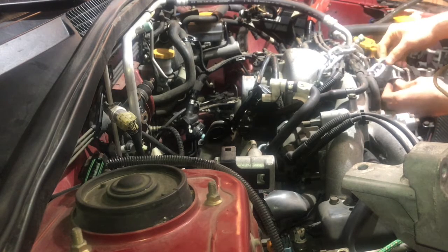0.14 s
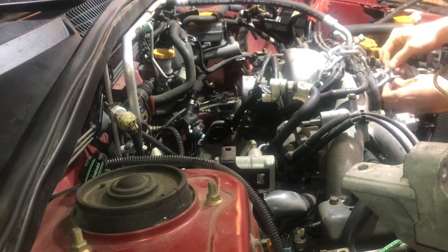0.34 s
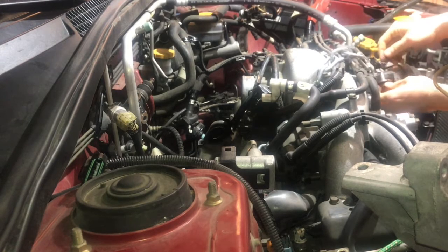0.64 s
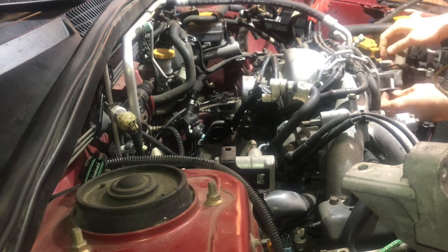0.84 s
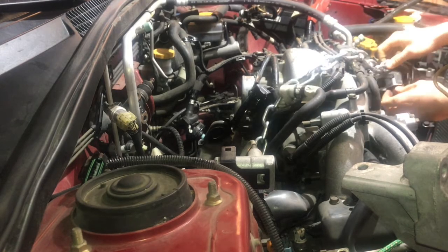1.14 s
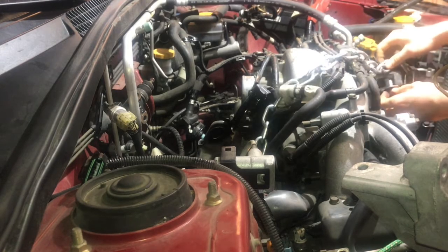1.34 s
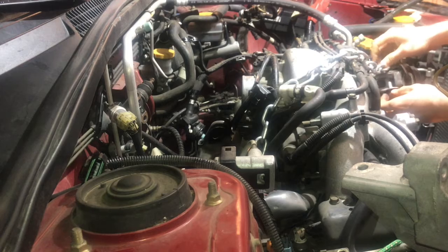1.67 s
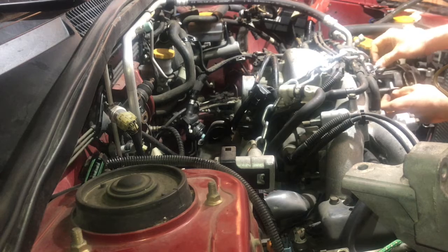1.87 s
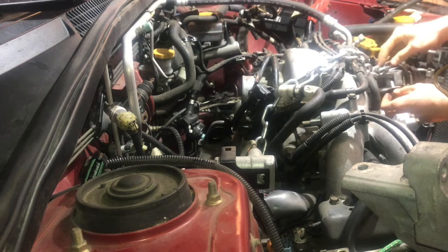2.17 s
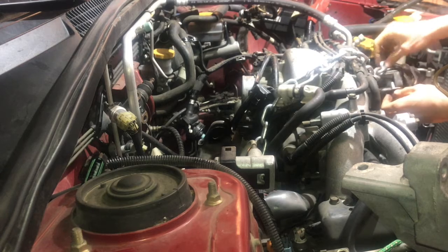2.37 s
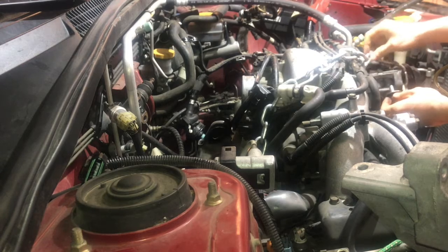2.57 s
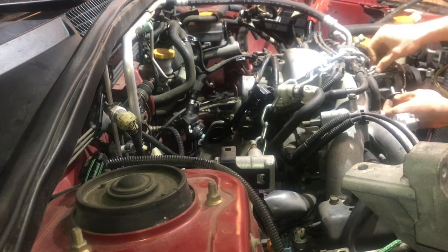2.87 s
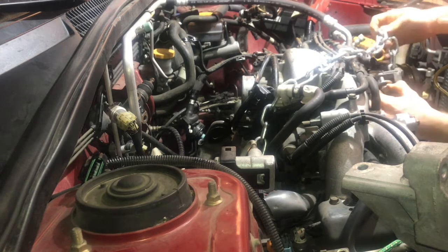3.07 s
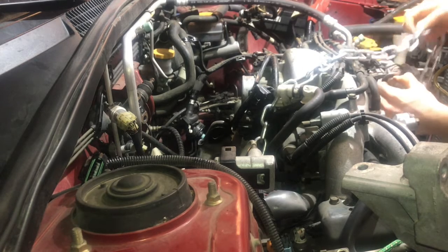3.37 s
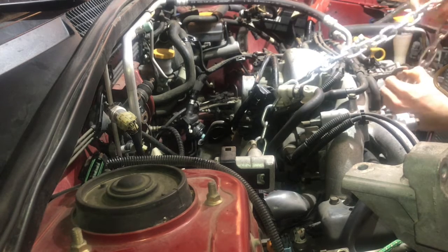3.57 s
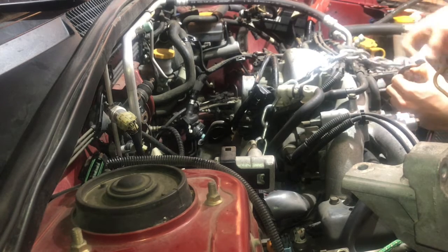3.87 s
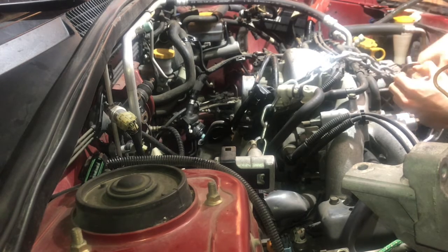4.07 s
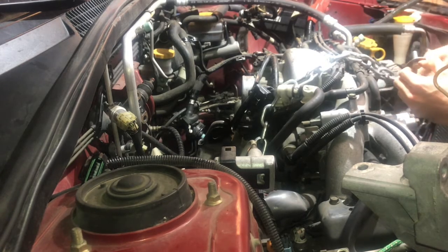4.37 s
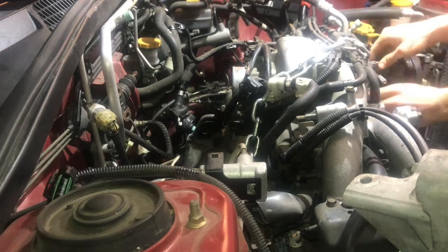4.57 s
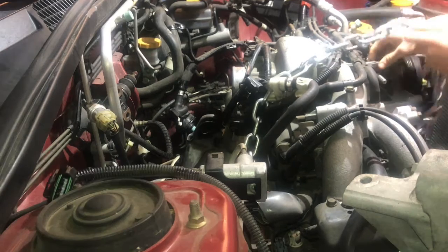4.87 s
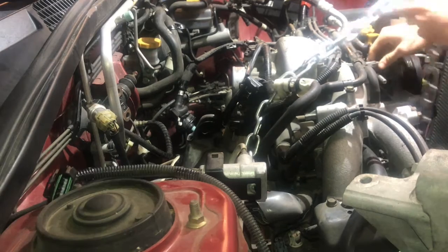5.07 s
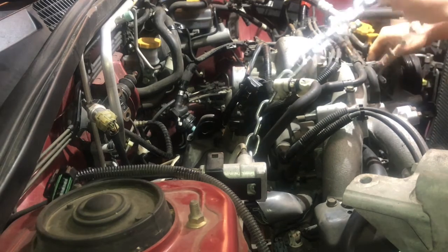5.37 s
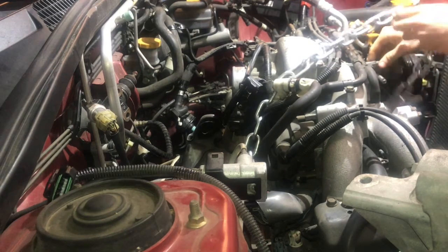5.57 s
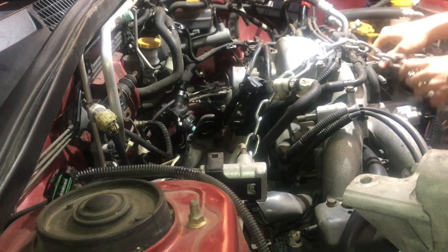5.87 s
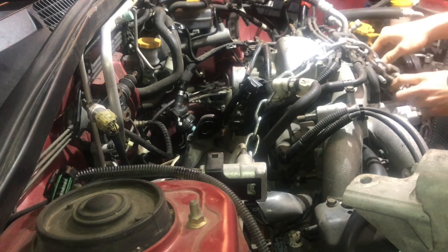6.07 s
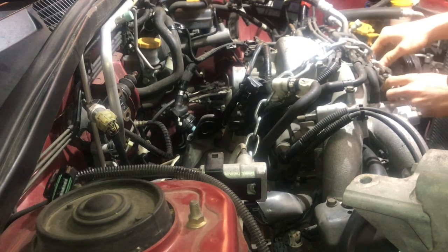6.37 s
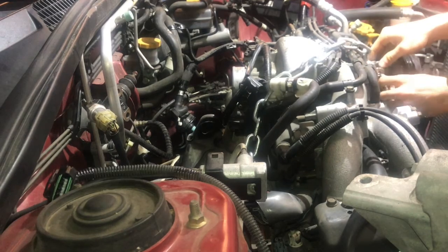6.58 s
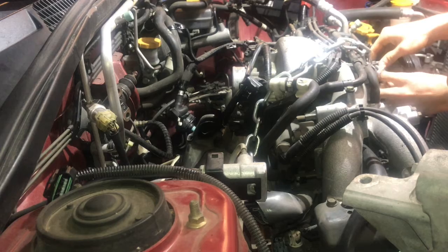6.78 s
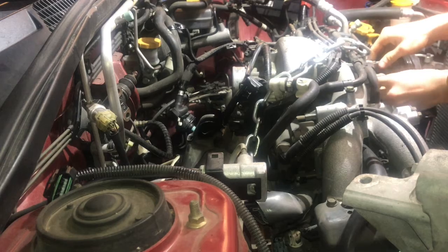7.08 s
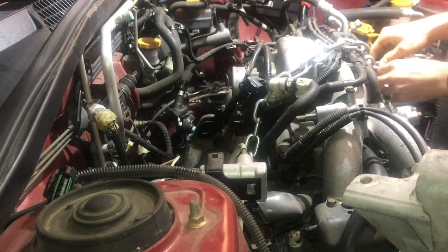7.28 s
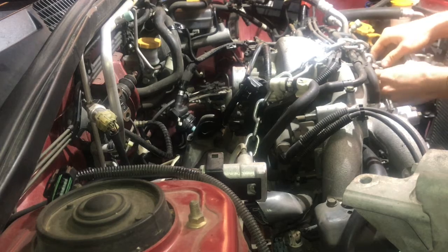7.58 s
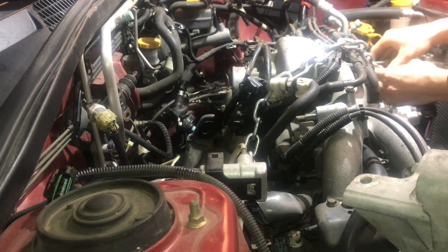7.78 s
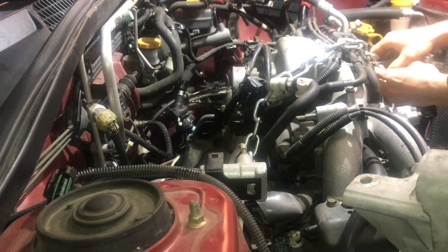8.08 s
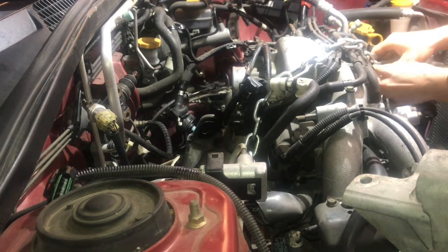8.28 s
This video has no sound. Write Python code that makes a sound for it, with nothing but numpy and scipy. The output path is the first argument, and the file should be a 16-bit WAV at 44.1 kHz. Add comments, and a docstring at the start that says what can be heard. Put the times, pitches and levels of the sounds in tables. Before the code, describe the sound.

Close view of a steel chain being hooked on over a car engine in a garage with a short reverberation and a faint steady low background. From 0 to 0.8 s the chain rattles busily: very high, thin ringing clinks, steel taps, short scrapes, hollow knocks and low panel booms. From 0.9 to 2.4 s it is nearly quiet, with faint fumbling, soft slides and a few isolated taps. At about 2.5 s a cluster of hard clacks lands on metal, continuing to 2.8 s. Scattered taps follow from 3 s, with a sharp strike at 3.85 s and small clinks until 4.4 s. The loudest, brightest jingling comes at 4.75 to 4.95 s, and again from 5.4 to 5.75 s, with squeaky scrapes and knocks around 6 s. Afterwards only sparse light taps, faint ticks and brief scrapes remain, fading out by 8.4 s.

```python
"""Links of a steel lifting chain ring very high against each other as it is hooked on over a car engine.
Each ring is a sum of decaying bending modes, with a coloured noise click at the contact.
Steel taps on castings (noise and modes in three bands), scrapes (stick-slip noise), knocks on hollow
covers, booms of body panels and single-note chimes of small fittings accompany it.
Decaying noise tails make the garage's reverberation, over a steady faint background noise."""
import sys
import numpy as np
from scipy import signal
from scipy.fft import rfft, irfft, next_fast_len
from scipy.io import wavfile
from scipy.ndimage import uniform_filter1d

SR = 44100
rng = np.random.default_rng(int(sys.argv[2]) if len(sys.argv) > 2 else 0)


def file_out(sig):
    """Save sig as 16-bit WAV at sys.argv[1]."""
    # one column per channel
    cols = np.atleast_2d(sig).T
    # limit, then scale
    lim = np.clip(cols, -1, 1)
    pcm = np.round(lim * 32767).astype(np.int16)
    wavfile.write(sys.argv[1], SR, pcm)


N = 371322
T = np.arange(SR // 2) / SR  # time within one hit, s


def amp(db):
    """Logarithmic level: decibels to an amplitude factor."""
    return 10 ** (np.asarray(db) / 20)


def along(points, hz):
    """Interpolation of (frequency, value) points on a logarithmic frequency axis."""
    f, v = np.transpose(points)
    return np.interp(np.log(hz + 1), np.log(f + 1), v)


def coloured(x, gain):
    """Linear filtering: multiply the spectrum by a gain that depends on frequency."""
    m = next_fast_len(len(x) + SR // 10)
    spectrum = rfft(x, m) * gain(np.fft.rfftfreq(m, 1 / SR))
    return irfft(spectrum, m)[:len(x)]


def band(x, lo_hz, hi_hz, order=3):
    """Causal band-pass filtering (Butterworth)."""
    sos = signal.butter(order, [lo_hz, min(hi_hz, SR / 2 - 1)], 'band', fs=SR, output='sos')
    return signal.sosfilt(sos, x)


def peaked(x):
    """Short-time power: scale each hit so that its loudest 3 ms have rms 1."""
    power = uniform_filter1d(x * x, size=132, axis=-1)
    return x / np.sqrt(power.max(axis=-1, keepdims=True))


def bursts(count, t60):
    """Broadband impact: one exponentially decaying burst of noise per hit."""
    return rng.standard_normal((count, len(T))) * amp(-60 * T / t60)


def rings(count, modes, scatter_db, detune, blur_hz):
    """Modal synthesis: strengths vary with the contact point, and loose contact blurs the pitch."""
    out = np.zeros((count, len(T)), np.float32)
    for pitch_hz, level_db, t60 in modes:
        t = T[T < t60]
        strength, offset, sign = rng.standard_normal((count, 3)).T[:, :, None]
        # the random pitch deviation is held for 90 samples at a time
        steps = np.float32(rng.standard_normal((count, len(T) // 90)))
        wander = steps[:, np.arange(len(t)) // 90]
        pitch = np.float32(pitch_hz * (1 + detune * offset)) + np.float32(blur_hz) * wander
        phase = np.cumsum(pitch * np.float32(2 * np.pi / SR), axis=1)
        gain = np.float32(np.sign(sign) * amp(level_db + scatter_db * strength))
        out[:, :len(t)] += gain * np.sin(phase) * np.float32(amp(-60 * t / t60))
    return peaked(out.astype(float))


def chatter(hits, gap, drop_db, count=2):
    """Repeated impact: each hit bounces `count` times, at uneven gaps and ever weaker."""
    out = hits.copy()
    for row, hit, gaps in zip(out, hits, rng.uniform(.3, 1.7, (len(hits), count))):
        for k, delay in enumerate(np.cumsum(gaps) * gap, 1):
            late = max(1, int(delay * SR))
            row[late:] += amp(-drop_db * k) * hit[:-late]
    return peaked(out)


def placed(times, hits):
    """Superposition: add the hits at their start times."""
    out = np.zeros(N + SR)
    for start_s, hit in zip(np.ravel(times), hits):
        out[max(0, round(start_s * SR)):][:len(T)] += hit
    return out[:N]


def columns(table):
    """Each column of an event table, shaped to broadcast over one row per hit."""
    return np.transpose(table)[:, :, None]


SCATTER_DB = 3  # spread of strength among chance contacts


def tumbling(start_s, length_s, level_db, *shared, count):
    """Random impacts: event rows for a run of contacts at uneven times and strengths."""
    times = start_s + length_s * (np.arange(count) + rng.random(count)) / count
    levels = level_db + SCATTER_DB * rng.standard_normal(count)
    return [(start, level, *shared) for start, level in zip(times, levels)]


# spectrum shape of the garage background: pitch_hz, level_db (relative)
AIR_SPECTRUM = [(20, -38), (45, -1), (70, -1.5), (100, -6), (230, -5), (400, -10.5), (700, -12.5),
                (1000, -14), (2000, -22), (4500, -26), (7000, -26.5), (10300, -31.5), (12000, -22),
                (15500, -26.5)]
AIR_DB = -59.5  # rms level


def air():
    """Stationary coloured noise: the steady faint background of the garage."""
    noise = coloured(rng.standard_normal(N), lambda hz: amp(along(AIR_SPECTRUM, hz)))
    return amp(AIR_DB) * noise / noise.std()


# reverberation time of the garage: pitch_hz, t60_s
REVERBERATION = [(150, 0.69), (600, 0.34), (1500, 0.29), (3700, 0.33), (9000, 0.29), (14000, 0.21)]


def garage(x, count=28):
    """Reverberation: noise tails decay per frequency; each successive stretch of sound gets a new one."""
    out = np.zeros(N + SR)
    for part in np.array_split(np.arange(N), count):
        hz, t, z = signal.stft(rng.standard_normal(len(T)), SR, nperseg=256)
        decay = amp(-60 * t / along(REVERBERATION, hz)[:, None])
        tail = signal.istft(z * decay, SR, nperseg=256)[1][:len(T)]
        tail *= 1 - np.exp(-T / 0.0012)  # gradual onset
        echo = signal.fftconvolve(x[part], tail / np.linalg.norm(tail))
        out[part[0]:][:len(echo)] += echo
    return out[:N]


# blows that shake the body panels: start_s, level_db (drone 2.5 dB lower)
PANEL_BLOWS = [(.016, -27), (.192, -33), (.424, -33.5)]
# resonances of the panels: pitch_hz, level_db (relative), t60_s
PANEL_RESONANCES = [(138, -7, .25), (200, -1, .35), (274, 0, .28)]


def booms():
    """Plate resonance: heavy blows set the car's panels droning, with a faint noise thud."""
    start_s, level_db = columns(PANEL_BLOWS)
    count = len(start_s)
    thud = peaked(band(bursts(count, t60=.35), 120, 340, order=5))
    drone = rings(count, PANEL_RESONANCES, scatter_db=2, detune=.008, blur_hz=20)
    drone = drone * (1 - np.exp(-T / .006))
    return placed(start_s, amp(level_db - 2.5) * (drone + amp(-17.0) * thud))


# dull blows on hollow covers: start_s, level_db (hollow ring), clack_db (over the ring, less 7 dB)
COVER_KNOCKS = [(.018, -31.5, 6.5), (.192, -33, 12), (.286, -35, 12.5), (.425, -29.5, 13.5),
                (.513, -33.5, 18), (2.557, -53, 31), (3.850, -42, 9), (3.924, -42.5, -8), (4.188, -38, 18),
                (4.206, -40.5, 21.5), (4.479, -49, 12), (4.808, -37, -26), (4.953, -45.5, 18.5),
                (5.481, -48.5, -1), (5.964, -32, 13), (6.080, -35, 20.5), (6.104, -45.5, 25.5),
                (6.174, -52.5, 17.5), (6.429, -50, -18), (6.556, -44.5, 4), (6.765, -49.5, 10),
                (6.951, -38.5, 6), (7.203, -47, -17), (7.666, -44, -16)]
# resonances of the covers: pitch_hz, level_db (relative), t60_s
COVER_RESONANCES = [(280, -6, .25), (336, 2, .19), (400, -9, .08), (591, -5, .15), (660, -9, .12)]


def knocks():
    """Shell resonance: covers give a short clack and a hollow ring."""
    start_s, level_db, clack_db = columns(COVER_KNOCKS)
    count = len(start_s)
    hollow = rings(count, COVER_RESONANCES, scatter_db=4, detune=0.023, blur_hz=24.8)
    hollow = hollow + amp(-4) * peaked(band(bursts(count, t60=0.15), 265, 780, order=4))
    hollow = peaked(hollow * (1 - np.exp(-T / 0.0025)))
    clack = peaked(band(bursts(count, t60=0.06), 590, 1760))
    return placed(start_s, amp(level_db) * (hollow + amp(clack_db - 7) * clack))


# loose fittings that ring on: start_s, level_db (played 2 dB higher), pitch_hz, t60_s
FITTING_CHIMES = [(.250, -30, 973, .2), (.293, -23, 8830, .088), (.305, -26.5, 960, .13),
                  (.398, -30, 8920, .096), (.295, -35.5, 4950, 0.2), (.360, -36.5, 965, 0.16),
                  (.580, -31.5, 2900, .1), (1.180, -58, 1980, .8), (1.185, -67, 5400, 0.44),
                  (1.560, -40, 1252, 0.083), (1.562, -49, 2644, .2), (3.268, -30.5, 941, .11),
                  (3.851, -25, 934, .12), (5.393, -38.5, 2240, .14), (5.440, -24.5, 2322, .067),
                  (6.622, -42.5, 3760, 0.03), (7.110, -46, 3990, .082), (7.542, -42, 4000, 0.056),
                  (7.872, -42.5, 6760, .083)]


def chimes():
    """Single-mode decay: small fittings ring with one note; the freer they hang, the longer and purer."""
    start_s, level_db, pitch_hz, t60_s = columns(FITTING_CHIMES)
    notes = []
    for pitch, t60 in zip(pitch_hz.flat, t60_s.flat):
        notes.append(rings(1, [(pitch, 0, t60)], scatter_db=0, detune=0, blur_hz=4 / t60))
    note = np.vstack(notes) * (1 - np.exp(-T / .001))
    return placed(start_s, amp(level_db + 2.0) * note)


# steel drags, squeaks or judders: start_s, length_s, level_db (5 dB lower when played),
# pitch_hz (band centre), width_octaves
DRAGS = [(0, 0.016, -33, 350, 3.7), (.229, .021, -28, 2760, .33), (.471, 0.11, -34.5, 3230, 3.7),
         (.702, 0.031, -25, 4780, .37), (1.557, 0.013, -34, 1820, 0.9), (1.72, 0.19, -59.5, 1350, 2),
         (1.193, 0.05, -52.5, 1490, 1.7), (2.01, 0.088, -49, 1295, 1.7), (2.098, 0.013, -34.5, 2230, 0.3),
         (2.38, 0.12, -45, 1590, 2.4), (2.553, 0.039, -34, 202, 0.97), (2.61, 0.18, -48, 123, 2.1),
         (2.702, 0.057, -37.5, 2320, 1.57), (2.98, 0.15, -54, 1580, 1.5), (3.235, 0.065, -36, 1780, 2),
         (3.53, 0.12, -47, 1430, 0.21), (3.885, 0.14, -35.5, 2560, 2.6), (4.116, 0.077, -39, 3600, 0.37),
         (4.242, 0.29, -49.5, 2170, 3), (4.485, 0.028, -43, 320, 0.52), (4.51, 0.044, -51.5, 1615, 1.2),
         (4.742, 0.08, -38, 2980, 3.7), (5.259, 0.11, -49.5, 1310, 2.5), (5.84, 0.028, -37.5, 1760, 2),
         (5.925, 0.018, -31, 2860, 0.15), (5.987, .021, -31, 2720, 0.069), (6.038, 0.079, -33, 2820, 0.42),
         (6.825, 0.11, -45, 2860, 1.9), (7.23, 0.066, -45, 6750, 0.088), (7.223, 0.081, -42.5, 1920, 2),
         (7.84, 0.097, -49, 1400, 1.5), (8.154, 0.081, -42, 1500, 1.8), (8.195, 0.0136, -35.5, 2340, 0.38)]
# steel slides briefly around each tap, from before it lands, a little louder for a hard tap
SLIDE_S, SLIDE_LEAD_S, SLIDE_HZ, SLIDE_OCTAVES = .08, 0.051, 1550, 1.9
SLIDE_DB, SLIDE_GROWS = -39.5, 0.55  # level beside a 0 dB tap (before the 5 dB cut), dB per dB of tap
# the panels shudder after each blow (level before the 5 dB cut)
SHUDDER_S, SHUDDER_DB, SHUDDER_HZ, SHUDDER_OCTAVES = 0.14, -49.5, 302, 1.73


def scrapes(slips_per_second=260, spread_db=3, slip_life=0.001):
    """Stick-slip friction: a run of tiny random contacts excites a band of noise."""
    rows = list(DRAGS)
    for start_s, tap_db, _ in STEEL_TAPS:
        level_db = SLIDE_DB + SLIDE_GROWS * tap_db
        rows.append((start_s - SLIDE_LEAD_S, SLIDE_S, level_db, SLIDE_HZ, SLIDE_OCTAVES))
    for start_s, _ in PANEL_BLOWS:
        rows.append((start_s, SHUDDER_S, SHUDDER_DB, SHUDDER_HZ, SHUDDER_OCTAVES))
    strokes = []
    for _, length_s, level_db, pitch_hz, width_octaves in rows:
        slips = rng.random(len(T)) < slips_per_second / SR
        slips = slips * amp(spread_db * rng.standard_normal(len(T)))
        # each slip's energy dies away, over a small constant hiss
        energy = signal.lfilter([1], [1, -np.exp(-1 / (slip_life * SR))], slips ** 2) + 0.051
        pressure = np.sqrt(np.abs(np.sin(np.pi * T / length_s))) * (T < length_s) + 1e-9
        friction = pressure * np.sqrt(energy) * rng.standard_normal(len(T))
        half_width = 2 ** (width_octaves / 2)
        stroke = band(friction, pitch_hz / half_width, pitch_hz * half_width, order=2)
        rms = np.sqrt(np.sum(stroke ** 2) / (length_s * SR))
        strokes.append(amp(level_db - 5.0) * stroke / rms)
    return placed([row[0] for row in rows], strokes)


# the clearest taps of steel on the engine: start_s, level_db, brightness_db
STEEL_TAPS = [(.073, -30.5, 2.5), (.232, -27.5, 4), (0.291, -40.5, 18.5), (.306, -25, 10),
              (.358, -32.5, 7.5), (.399, -43, 21.5), (.449, -21.5, 3.5), (.514, -18.5, -1),
              (.531, -25, 7.5), (0.55, -37.5, -8), (0.604, -25, -3), (.730, -31, 6.5), (.793, -33.5, 8),
              (1.277, -38, 6), (1.36, -48, -4.5), (1.405, -50.5, -6.5), (1.559, -33.5, -5),
              (2.103, -43.5, 1), (2.178, -41.5, -6), (2.303, -46, -9), (2.371, -36, -3), (2.506, -27.5, -3),
              (2.526, -50, -23), (2.541, -24, 7), (2.554, -21, -2.5), (2.563, -13.5, -2), (2.668, -23.5, 0),
              (2.728, -23, 2.5), (2.742, -39, -2), (2.762, -27, -1.5), (2.832, -43.5, -11),
              (3.014, -42.5, 2), (3.160, -53, -17), (3.174, -31.5, -4.5), (3.266, -24.5, -4),
              (3.353, -25, 5), (3.390, -29, 3.5), (3.511, -28.5, 1), (3.658, -38, 1), (3.762, -34, -5),
              (3.803, -35.5, 0.5), (3.844, -27, 1), (3.850, -14, 4), (3.916, -19.5, 10), (3.949, -25, -6),
              (4.124, -23.5, 9.5), (4.241, -26.5, 12), (4.286, -36.5, -7.5), (4.409, -32, 6.5),
              (4.753, -37, 13), (4.802, -27, 2.5), (4.884, -35, 7.5), (5.047, -36, 8.5), (5.131, -39, 10),
              (5.312, -49.5, 12.5), (5.392, -30.5, 11.5), (5.431, -30, 10), (5.446, -23, 3),
              (5.474, -26, 8), (5.511, -29.5, 8), (5.607, -35.5, 12), (5.713, -27, 3.5), (5.726, -33.5, 12),
              (5.893, -32.5, 7.5), (6.045, -29.5, 3.5), (6.221, -41, 1), (6.425, -41, -3.5),
              (6.557, -39, -1.5), (6.766, -44.5, -0.5), (6.814, -36.5, 5.5), (6.993, -30, 3),
              (7.075, -40, 2.5), (7.111, -32, 2), (7.145, -40.5, 6.5), (7.203, -36.5, -6),
              (7.336, -44.5, -10), (7.441, -42, -3), (7.483, -41.5, -3), (7.541, -32.5, -1.5),
              (7.637, -33.5, -0.5), (7.666, -32, -6.5), (7.872, -36, -1.5), (8.198, -46, -8),
              (8.322, -50.5, 1), (8.38, -49, 5.5)]
# the chain runs, and links tumble at random: start_s, length_s, ring_db, tap_db (links() plays the rings)
CHAIN_RATTLES = [(.29, .14, -35, -33), (.46, .15, -23, -28), (2.52, .08, -29, -29), (2.67, .11, -41, -31),
                 (3.86, .12, -33, -28), (4.21, .16, -29, -39), (4.78, .21, -24, -41), (5.41, .22, -26, -37),
                 (5.71, .07, -23, -36), (5.89, .16, -25, -43)]
# fingers shift the hook, which ticks faintly: start_s, length_s, level_db
HOOK_FUMBLES = [(1.304, 0.2, -59), (2.026, 0.078, -66), (3.461, 0.075, -46.5), (6.588, .13, -51),
                (6.832, 0.1, -58), (7.231, .15, -46), (8.15, .11, -49)]
# castings and brackets: pitch_hz, level_db (relative), t60_s
CASTING_RESONANCES = [(965, 1, .12), (1080, -6, .08), (1165, 0, .13), (1380, -4, .1), (1620, -7, .08),
                      (2080, -5, .11), (2165, -4, .13), (2350, -4, .09), (2640, -4, .13), (3200, -9, .09),
                      (3440, -7, .1), (3900, -9, .08), (4350, -5, .08), (5230, -9, .07), (5740, -7, .08)]
# small hooks and bolts, different at every touch: pitch_hz, level_db (relative), t60_s
FITTING_RESONANCES = [(1050, -1, .035), (1550, 0, .03), (2300, 0, .035), (3000, -1, .03), (4100, 0, .035),
                      (5800, -2, .025), (7800, -3, .025)]
RATTLE_BRIGHTNESS_DB, FUMBLE_BRIGHTNESS_DB = 1.5, -2
CLANK_DB, CLINK_DB, CRACK_DB = -4.5, -2.5, -9.5  # low, middle and high part of a tap of brightness 0
GRAZE_LEAD_S, GRAZE_DB = 0.0045, -21  # steel grazes the surface just before it lands


def taps():
    """Impact excitation: noise, a fitting's note and the castings' ring; brightness tilts the bands."""
    rows = list(STEEL_TAPS)
    for start_s, length_s, _, tap_db in CHAIN_RATTLES:
        rows += tumbling(start_s, length_s, tap_db, RATTLE_BRIGHTNESS_DB, count=4)
    for start_s, length_s, tap_db in HOOK_FUMBLES:
        rows += tumbling(start_s, length_s, tap_db, FUMBLE_BRIGHTNESS_DB, count=4)
    start_s, level_db, brightness_db = columns(rows)
    count = len(start_s)
    blow = bursts(count, t60=0.0082) + amp(-10.0) * bursts(count, t60=0.055)
    fitting = amp(-9) * rings(count, FITTING_RESONANCES, scatter_db=4, detune=.12, blur_hz=130)
    castings = amp(-18) * rings(count, CASTING_RESONANCES, scatter_db=4, detune=.008, blur_hz=50)
    body = (blow + fitting + castings) * (1 - np.exp(-T / 0.00043))
    body = chatter(body, gap=0.0081, drop_db=18.5, count=3)
    clank = amp(CLANK_DB - brightness_db) * peaked(band(body, 754, 1860))
    clink = amp(CLINK_DB) * peaked(band(body, 2320, 4230))
    crack = amp(CRACK_DB + brightness_db) * peaked(band(body, 5470, 9070, order=2))
    hits = amp(level_db) * (clank + clink + crack)
    graze = amp(GRAZE_DB) * placed(start_s - GRAZE_LEAD_S, hits)
    return placed(start_s, hits) + graze


# the clearest clinks of link on link: start_s, level_db (ring 1 dB lower)
LINK_CLINKS = [(.074, -33), (.243, -24), (.294, -27.5), (.398, -29.5), (.449, -16.5), (.470, -25.5),
               (.505, -18.5), (.543, -16), (.558, -13.5), (.580, -20), (.606, -11), (.616, -36),
               (.698, -23), (.734, -21), (.800, -19), (.822, -19.5), (1.279, -34), (2.556, -18),
               (2.728, -23), (3.267, -40), (3.405, -30), (3.851, -31), (3.932, -22.5), (4.095, -28),
               (4.127, -18.5), (4.246, -21), (4.258, -17), (4.312, -25), (4.410, -31), (4.751, -15.5),
               (4.796, -17), (4.854, -10.5), (4.872, -16), (4.883, -6), (4.899, -8), (4.945, -5),
               (5.010, -22.5), (5.047, -20), (5.132, -32), (5.168, -37.5), (5.313, -24.5), (5.392, -10.5),
               (5.474, -22.5), (5.497, -15), (5.507, -13), (5.560, -15), (5.664, -12.5), (5.683, -18),
               (5.715, -10), (5.727, -8), (5.887, -18.5), (5.914, -15.5), (5.994, -20), (6.069, -12),
               (6.085, -12.5), (6.105, -16.5), (6.256, -30.5), (6.419, -28.5), (6.428, -28.5), (6.558, -24),
               (6.818, -32), (6.860, -30), (6.992, -24.5), (7.075, -29.5), (7.203, -34), (7.489, -31.5),
               (7.541, -37), (7.666, -26), (7.996, -48)]
# bending modes of the links: pitch_hz, level_db (relative), t60_s
LINK_RESONANCES = [(13032, -.5, .26), (13075, -6, .13), (13785, -3, .14), (13870, -1, .16),
                   (14025, -2, .19), (14548, -1, .17)]
# spectral gain of a link's click: pitch_hz, level_db
CLICK_SPECTRUM = [(300, -22.5), (900, -12), (2500, -12.5), (5000, 0), (10000, -2.5), (12000, 6.5),
                  (14000, 21), (15000, -20), (15800, -19.5)]
# links held in the hand touch lightly and are damped; loose ones strike hard and ring freely
GRIP_DAMPING_DB_PER_S, HELD_DB, LOOSE_DB = 742, -23.5, -21
LINK_GRAZE_LEAD_S, LINK_GRAZE_DB = 0.0057, -20  # links brush each other just before they strike


def links():
    """Bending vibration of bars: slightly detuned high modes ring after a click of contact."""
    rows = list(LINK_CLINKS)
    for start_s, length_s, ring_db, _ in CHAIN_RATTLES:
        rows += tumbling(start_s, length_s, ring_db, count=4)
    start_s, level_db = columns(rows)
    count = len(start_s)
    ring = rings(count, LINK_RESONANCES, scatter_db=3, detune=.002, blur_hz=56)
    grip = np.interp(level_db, [HELD_DB, LOOSE_DB], [1, 0])
    damping = amp(-GRIP_DAMPING_DB_PER_S * grip * T)
    # neighbouring links soak up part of the first swing
    swing = (1 - np.exp(-T / 0.002)) * (1 + .6 * np.exp(-T / 0.009))
    ring = chatter(ring * swing * damping, gap=0.0049, drop_db=5.5, count=3)
    ring = amp(level_db - 1) * ring
    burst = peaked(bursts(count, t60=0.017) + amp(-0.5) * bursts(count, t60=0.084))
    click = placed(start_s, amp(level_db - 14) * burst)
    click = coloured(click, lambda hz: amp(along(CLICK_SPECTRUM, hz)))
    brush = ring * (1 - np.exp(-T / 0.0077))
    graze = amp(LINK_GRAZE_DB) * placed(start_s - LINK_GRAZE_LEAD_S, brush)
    return placed(start_s, ring) + graze + click


ROOM_LINKS_DB, ROOM_METAL_DB, ROOM_DULL_DB = -8.5, -6, -5.5  # how much of each source the garage returns


def scene():
    """Superposition of direct sound, reverberation and background."""
    high = links()
    metal = taps() + scrapes()
    dull = knocks() + booms() + chimes()
    room = garage(amp(ROOM_LINKS_DB) * high + amp(ROOM_METAL_DB) * metal + amp(ROOM_DULL_DB) * dull)
    return (high + metal + dull + room + air())[None]


TOP_HZ = 15784  # upper band limit


def record(dry):
    """Amplitude and band limiting: clip at full scale and keep nothing above the band limit."""
    return coloured(np.clip(dry[0], -1, 1), lambda hz: hz < TOP_HZ)[None]


dry = scene()
out = record(dry)
file_out(out)
```